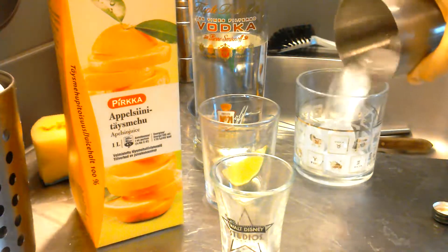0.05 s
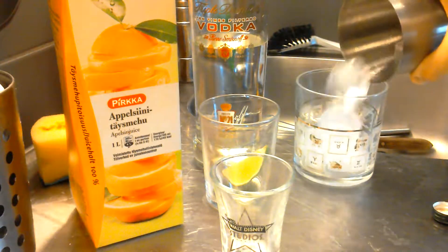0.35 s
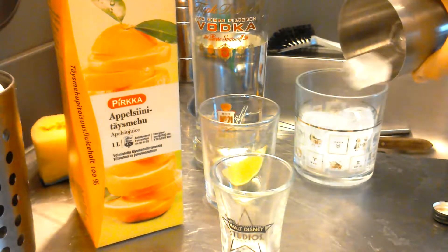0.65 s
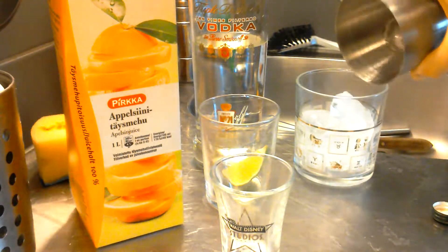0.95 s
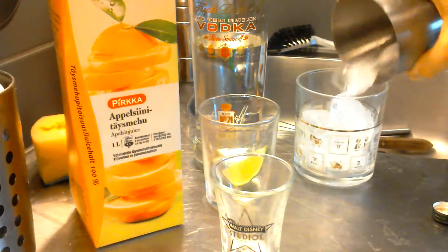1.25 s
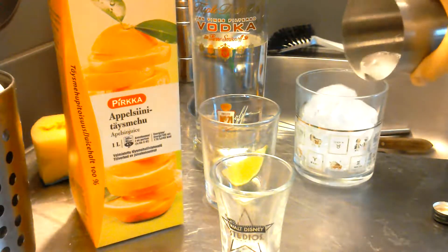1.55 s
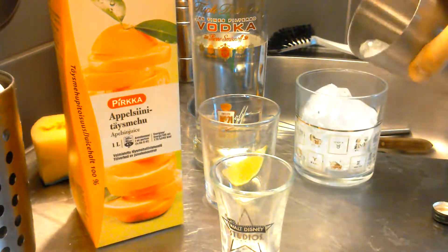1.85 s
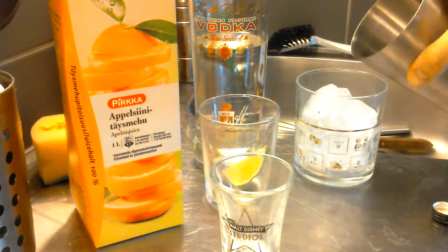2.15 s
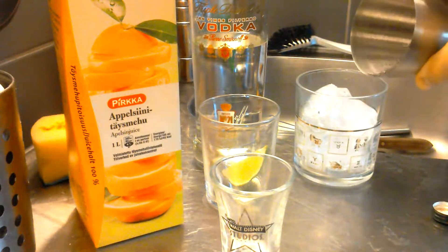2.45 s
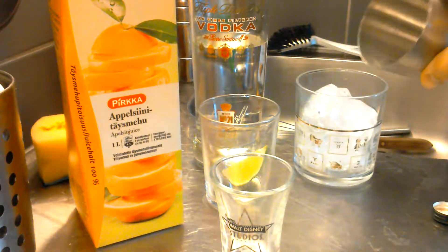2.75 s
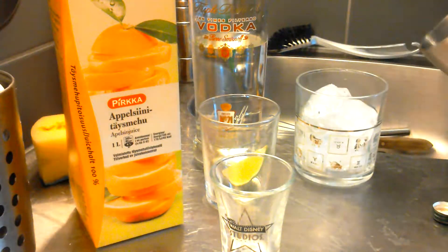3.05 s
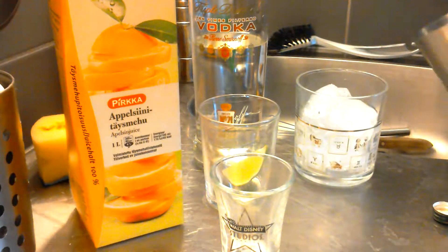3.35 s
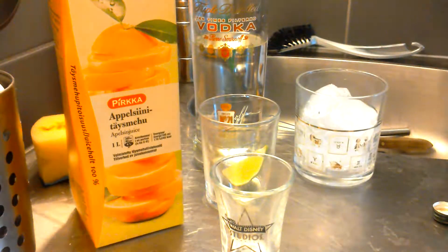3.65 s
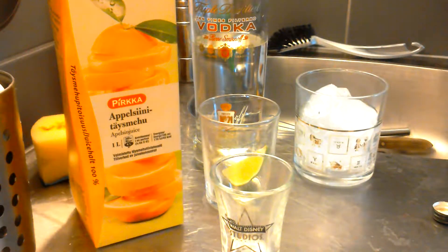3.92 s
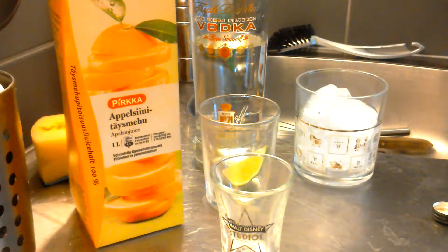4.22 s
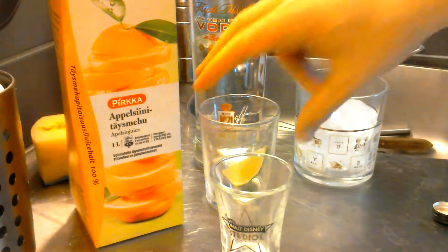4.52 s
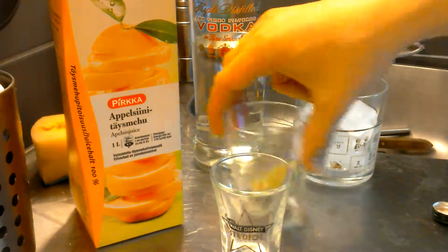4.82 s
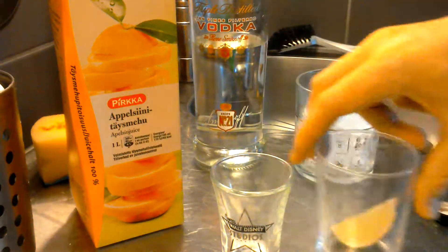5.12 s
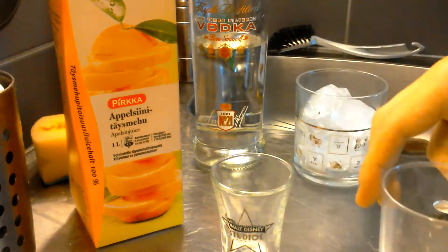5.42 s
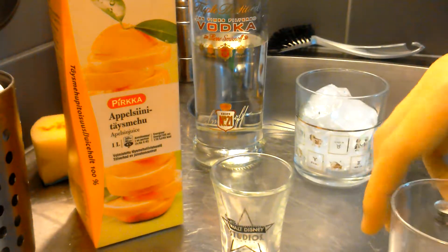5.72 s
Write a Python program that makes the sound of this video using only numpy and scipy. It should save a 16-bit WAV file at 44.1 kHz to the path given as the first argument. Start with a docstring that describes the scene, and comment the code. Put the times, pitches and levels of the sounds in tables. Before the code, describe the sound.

Ice cubes clatter from a steel cup into a glass, the cup clinks, then another glass scrapes across a steel counter.

```python
"""Ice cubes clatter from a steel measuring cup into a glass tumbler on a steel kitchen counter. Each impact
excites the damped normal modes of ice, glass and counter, and the glass rings shorter as it fills.
The emptied cup clinks and is put down; a second glass is gripped and slid across the counter, scraping
by stick-slip friction. The loudest cubes overload the close microphone, and a noise gate fades the
hiss in the pauses."""
import sys
import numpy as np
from scipy import signal
from scipy.fft import rfft, irfft, next_fast_len
from scipy.io import wavfile
from scipy.ndimage import uniform_filter1d

SR = 44100
rng = np.random.default_rng(int(sys.argv[2]) if len(sys.argv) > 2 else 0)


def dump_mix(stems):
    """Bounce the given channels to the path in sys.argv[1] as a 16-bit WAV at rate SR."""
    frames = np.atleast_2d(stems).T  # one column per channel
    limited = np.clip(frames, -1, 1)  # hard clip at full scale
    pcm = np.round(limited * 32767).astype(np.int16)
    wavfile.write(sys.argv[1], SR, pcm)


N = 254898
TIME = np.arange(N) / SR
AGE = np.arange(int(.6 * SR)) / SR   # time since an impact, s

# background hiss: f/Hz, spectral level/dB
HISS_SPECTRUM = [(150, -37), (250, -7), (475, -4.5), (1390, -10), (4380, -12), (6410, -6), (10200, -10),
                 (11600, -8.5), (15800, -7.5)]
# soft low bumps: t/s, level/dB
LOW_BUMPS = [(3.02, -43), (3.256, -36.5), (4.416, -39.5)]

# speed of the sliding glass, given as the level of its grit: t/s, level/dB
SLIDE_SPEED = [(4.48, -46), (4.55, -57.5), (4.64, -48), (4.72, -40), (4.87, -37), (4.92, -45.5),
               (5.08, -41), (5.26, -44.5), (5.48, -58.5), (5.77, -67)]
# the hand presses the glass down: t/s, duration/s, level/dB
HAND_PUSHES = [(4.535, 0.017, -43.5), (4.67, 0.014, -24), (4.699, 0.099, -36.5), (5.053, 0.028, -35),
               (5.443, 0.021, -58)]
# fine grit under the glass: f/Hz, spectral level/dB
GRIT_SPECTRUM = [(1290, -7), (2200, -4), (2570, -7), (5410, -6), (10200, -1), (14500, -3.5), (15800, -4.5)]
# hollow resonances of a scrape or knock on the counter: f/Hz, bandwidth/Hz, gain/dB
CONTACT_PEAKS = [(417, 39, 6), (567.7, 8, 14), (703, 24, 8.5), (881, 45, 7.5), (1017, 100, 4),
                 (1866, 56, 7), (2190, 51, 2)]
# resonances of the counter sheet under friction: f/Hz, bandwidth/Hz, gain/dB
DRONE_PEAKS = [(84, 39, 3.5), (142, 17.3, 15.5)]

# counter sheet modes: f/Hz, level struck under the tumbler/dB, level struck at the side/dB, t60/s
COUNTER_MODES = [(62, -22.5, -19, 0.58), (82.6, -10.5, -8, .28), (117.6, -8, 2, 0.4),
                 (132.7, -12.5, -1.5, 0.29), (157.5, 0, -6, 0.44), (178, -3, -13, 0.23),
                 (217.6, -8.5, -15, .15), (314, -15, -13, 0.089)]
# blows at the side of the counter: t/s, level/dB
SIDE_BLOWS = [(2.362, -29.5), (2.428, -37.5), (3.735, -21), (3.794, -28.5)]
# knocks on the counter: t/s, note level/dB, note f/Hz, tick re note/dB
COUNTER_KNOCKS = [(2.363, -26, 892, 11), (3.732, -19.5, 698, 8.5), (3.789, -21.5, 432, -12),
                  (3.796, -27, 570, -11.5), (4.652, -23, 586, -24), (4.669, -13, 597, -2),
                  (4.762, -32, 430, 1.5), (4.797, -24.5, 448, -25), (4.857, -29, 573, -11),
                  (4.948, -28, 440, -25), (5.161, -30.5, 400, -12), (5.204, -30.5, 457, -10),
                  (5.445, -36.5, 437, 2.5), (5.542, -42.5, 410, 0)]

# ice and fingers rub the cup: t/s, duration/s, friction level/dB, rim level/dB
CUP_RUBS = [(0, 0.4, -30.5, -63), (1.002, 0.23, -44.5, -58.5), (1.26, .14, -35.5, -65.5),
            (1.848, 0.044, -48, -67), (1.914, 0.04, -32.5, -51), (3.022, 0.065, -46, -55.5)]
# cup contacts: t/s, wall level/dB, rim re wall/dB, bright rasp re wall/dB
CUP_CONTACTS = [(1.913, -36, -13.5, 12), (1.93, -25.5, -6.5, 15.5), (1.953, -18, 0.5, 12.5),
                (1.963, -26, 1.5, 12), (2, -26, 11, 7), (2.349, -29, -11, -13), (2.36, -20, -35, -31),
                (2.428, -49, 17, -10), (2.453, -44, 0, -13), (2.582, -63.5, 13.5, 4), (2.638, -65, 13.5, 1),
                (2.709, -52, 7.5, 3), (2.764, -73, 24.5, -2.5), (2.869, -50.5, -14.5, 5.5),
                (3.09, -21, 10, -4.5), (3.105, -20, 3.5, 1.5), (3.113, -34, 19.5, 4.5),
                (3.669, -43, 3, -6.5), (3.694, -30, -17.5, -0.5), (3.703, -28, -16, -11),
                (3.733, -21, -5.5, -5.5)]
# modes of the cup's rim: f/Hz, level/dB, t60/s
RIM_MODES = [(1587.4, 5, 0.11), (1587, -5.5, 0.2), (1613, -37.5, 0.33), (1686, -3.5, 0.115),
             (3140, -26, 0.23), (3245, -10, 0.09), (3340, -15.5, 0.15)]
# modes of the cup's wall: f/Hz, level/dB, t60/s
CUP_WALL_MODES = [(2350, -9, 0.079), (2796, -10.5, .09), (3466, -1, 0.06), (3800, -3, 0.081),
                  (3960, -0.5, 0.12), (4020, 5.5, 0.063), (4160, 1.5, 0.055), (5100, -6.5, 0.12),
                  (5270, -2.5, 0.057), (5680, -6.5, 0.083), (6029, 0.5, 0.091), (7170, -12, .08),
                  (7140, -1, 0.069), (8220, -9, 0.093), (9250, -4.5, .08), (9840, -3.5, 0.1),
                  (12290, -8.5, .09), (14150, -4.5, .05)]
# resonances of the air in the cup: f/Hz, bandwidth/Hz, gain/dB
CUP_AIR_PEAKS = [(450, 60, 6.5), (635, 20, 16.5), (930, 60, 6.5)]
# resonances in the cup's bright rasp: f/Hz, bandwidth/Hz, gain/dB
RASP_PEAKS = [(5780, 70, 13), (7256, 91, 14.5), (8250, 57, 13), (9400, 100, 5), (10080, 140, 12)]

# tumbler wall modes, shifted by packed ice: f nearly empty/Hz, f packed/Hz
TUMBLER_PITCHES = [(1873, 1825), (2010, 2040), (2330, 2335), (4257, 4295), (4280, 4335), (4400, 4485),
                   (6595, 7090), (7138, 7233), (9645, 9500), (9695, 9720), (10487, 10780), (10720, 10870),
                   (12362, 12380), (14949, 14966)]
# the same modes: level/dB, t60 nearly empty/s
TUMBLER_DECAYS = [(-9.5, 0.22), (-15, 0.075), (-14, 0.25), (3, .16), (-10.5, 0.23), (-13, 0.11),
                  (-16.5, 0.11), (0.5, .15), (-10.5, 0.16), (-12.5, .15), (-5.5, .13), (-14.5, .1),
                  (-8.5, 0.19), (-18, .14)]
# hollows of glass and counter that colour every clack: f/Hz, bandwidth/Hz, gain/dB
CLACK_PEAKS = [(413, 20, 10.5), (592, 5.7, 18), (910, 110, 5.5), (985, 46, 13), (1324, 650, -2),
               (1966, 120, 3), (2180, 320, 9.5), (3130, 190, 2.5), (4920, 160, 4)]
# cubes landing: t/s, level/dB, brittleness/dB (dull < 0 < splintery), tumbler re level/dB, cube note f/Hz
CUBE_IMPACTS = [(.001, -10, -11.5, -14, 1875), (0.053, -5.5, -1.5, -24, 3290),
                (0.068, -1.5, 2.5, -20.5, 855), (.09, 3.5, -1, -12, 1774), (.124, -2.5, 1, -9.5, 1870),
                (.132, 3.5, 4, -12, 1926), (.145, 1.5, 4, -10.5, 2090), (.165, 4.5, 1, -22, 3840),
                (0.205, -4.5, -6, -18.5, 1012), (.244, 10, 6, -24.5, 2280), (.268, 3, 1, -20.5, 976),
                (.281, -4, 8, -15, 960), (0.309, 0.5, 4.5, -19.5, 4030), (0.333, -8, -1.5, -18.5, 1057),
                (.349, -6, 9.5, -36, 1833), (.374, -1, 6, -29, 3980), (.392, -8.5, 6.5, -25.5, 3540),
                (.42, -15, -6.5, -30, 2380), (.485, -6.5, 6.5, -27.5, 848), (.6, -1.5, -7.5, -21, 2380),
                (.647, -5.5, -3, -19, 1840), (0.673, -7.5, -3.5, -22, 3320), (0.734, -9.5, -4, -40, 2424),
                (.819, -9, 6.5, -28, 4000), (.976, -9, 7, -30.5, 850), (1.124, -3, 4.5, -21.5, 840),
                (1.158, -12, -6.5, -24.5, 2870), (1.191, -4, -3.5, -17, 2295), (1.245, -1, 0, -14, 1864),
                (1.319, -1.5, -0.5, -14.5, 925), (1.334, -6, -3.5, -16, 950), (1.349, -9, -1.5, -6.5, 2130),
                (1.381, 4, -2, -23, 2260), (1.391, -3.5, 0.5, -13.5, 924), (1.416, -19.5, 5.5, -22.5, 2245),
                (1.46, -12, -4, -13, 942), (1.509, -32.5, -14, -23.5, 964)]


def from_db(db):
    """Amplitude grows tenfold for every 20 dB."""
    return 10 ** (np.asarray(db) / 20)


def rms_one(x):
    """Normalisation to unit mean power."""
    return x / np.sqrt(np.mean(x ** 2) + 1e-20)


def add(out, at, sound):
    """Superposition: a sound joins the mix at a time in seconds."""
    start = max(0, round(at * SR))
    out[start:start + len(sound)] += sound[:N - start]


def decay(t60):
    """Exponential damping: the amplitude falls 60 dB in t60 seconds."""
    return np.exp(-np.log(1000) * AGE / t60)


def onset(rise_s):
    """A resonator approaches full amplitude exponentially."""
    return 1 - np.exp(-AGE / rise_s)


def ring(modes):
    """Free vibration is a sum of damped sinusoids (f/Hz, level/dB, t60/s), here of alternating sign."""
    out = np.zeros(len(AGE))
    for k, (hz, db, t60) in enumerate(modes):
        age = AGE[AGE < t60]
        out[:len(age)] += (-1) ** k * from_db(db - 60 * age / t60) * np.sin(2 * np.pi * hz * age)
    return out


def perturbed_ring(modes, detune, spread_db):
    """Each contact point loads and excites the modes a little differently."""
    chance = rng.standard_normal((len(modes), 2))
    return ring([(hz * (1 + detune * a), db + spread_db * b, t60)
                 for (hz, db, t60), (a, b) in zip(modes, chance)])


def irregular_ring(low_hz, high_hz, cycles, spread_db, count):
    """An irregular body has scattered modes; at equal Q all die in the same number of cycles."""
    places = (np.arange(count) + rng.random(count)) / count
    pitches = low_hz * (high_hz / low_hz) ** places
    return ring(zip(pitches, rng.normal(0, spread_db, count), cycles / pitches))


def strike(times, levels_db, response):
    """A linear body answers each blow with a scaled copy of its impulse response."""
    out = np.zeros(N)
    for at, db in zip(times, levels_db):
        add(out, at, from_db(db) * response)
    return out


def bursts(times, levels_db, t60, rise_s, snap=0, snap_t60=.02):
    """Incoherent blows add in power: an envelope with a brief snap and a longer decay for each."""
    shape = (decay(t60) + snap * decay(snap_t60)) * onset(rise_s)
    return np.sqrt(strike(times, 2 * levels_db, shape ** 2))


def strokes(starts, lengths, levels_db, attack_s, release_s):
    """Envelope of driven vibration: it builds, holds through each stroke and decays."""
    out = np.zeros(N)
    for start, length, db in zip(starts, lengths, levels_db):
        before = np.maximum(start - TIME, 0) / attack_s
        after = np.maximum(TIME - start - length, 0) / release_s
        out += from_db(db) * np.exp(-np.minimum(before + after, 20))
    return out


def band_noise(low_hz, high_hz, peaks=(), order=2):
    """Crowded modes act as a band of noise, coloured by resonant peaks; rms 1."""
    band = signal.butter(order, [low_hz, high_hz], "band", fs=SR, output="sos")
    x = signal.sosfilt(band, rng.standard_normal(N))
    for hz, width, db in peaks:
        resonance = signal.lfilter(*signal.iirpeak(hz, hz / width, fs=SR), x)
        x = x + (from_db(db) - 1) * resonance
    return rms_one(x)


def shaped_noise(spectrum):
    """White noise takes on the spectrum (f/Hz, level/dB) of its filter; rms 1."""
    hz, db = np.transpose(spectrum)
    size = next_fast_len(N)
    bins_hz = np.maximum(np.fft.rfftfreq(size, 1 / SR), 1)
    gain = from_db(np.interp(np.log(bins_hz), np.log(hz), db))
    return rms_one(irfft(rfft(rng.standard_normal(size)) * gain, size)[:N])


def flutter(per_s, depth_db):
    """Random amplitude modulation with per_s new values a second; rms 1."""
    steps = rng.standard_normal(N)
    return rms_one(from_db(depth_db * np.interp(TIME * per_s, np.arange(N), steps)))


def background():
    """Stationary noise (hiss, a narrow high whisper, rumble) and soft bumps of one damped low mode."""
    hiss = shaped_noise(HISS_SPECTRUM) + from_db(-7) * band_noise(11150, 11900)
    rumble = band_noise(36, 105)
    bump = ring([(49, 0, .48)]) * onset(.01)
    return from_db(-54.5) * hiss + from_db(-57.5) * rumble + strike(*np.transpose(LOW_BUMPS), bump)


def kitchen(x, t60, treble_t60, wet_db, treble_db):
    """Reverberation: reflections from tiles and steel add a short dense tail in two bands."""
    low = band_noise(230, 2700)[:len(AGE)] * decay(t60)
    high = from_db(treble_db) * band_noise(5900, 15000)[:len(AGE)] * decay(treble_t60)
    tail = (low + high) * np.clip(AGE / .011, 0, 1)
    tail /= np.sqrt(np.sum(tail ** 2))
    return x + from_db(wet_db) * signal.fftconvolve(x, tail)[:N]


def coarse_grains(per_s):
    """Shot noise: grains crack at random moments and with random strength; rms 1."""
    clicks = (rng.random(N) < per_s / SR) * rng.standard_normal(N)
    tick = irregular_ring(2526, 16100, cycles=180, spread_db=5.5, count=14)
    return rms_one(signal.fftconvolve(clicks, tick)[:N])


def sliding_glass():
    """Stick-slip friction: speed raises grit, scrape and the sheet's drone; pressure adds to the last two."""
    speed_db = np.interp(TIME, *np.transpose(SLIDE_SPEED))
    moving = np.clip((TIME - SLIDE_SPEED[0][0]) / .058, 0, 1)
    pressure = strokes(*np.transpose(HAND_PUSHES), attack_s=.014, release_s=.014)
    drone_gain = from_db(.67 * speed_db - 16.5) + from_db(-21.5) * pressure
    drone = drone_gain * band_noise(52, 355, DRONE_PEAKS)
    scrape_gain = from_db(speed_db - 5) + pressure
    scrape = scrape_gain * band_noise(314, 1330, CONTACT_PEAKS) * flutter(90, depth_db=3.5)
    fine = shaped_noise(GRIT_SPECTRUM) * flutter(470, depth_db=3.5)
    grit = from_db(speed_db) * (fine + from_db(-13.5) * coarse_grains(per_s=290))
    return moving * (drone + scrape + grit)


def counter_blows():
    """A struck plate booms in its lowest modes; a knock gives a tick and a dull note set by the spot."""
    boom = ring([(hz, db, t60) for hz, _, db, t60 in COUNTER_MODES])
    out = strike(*np.transpose(SIDE_BLOWS), boom)
    times, note_db, note_hz, tick_db = np.transpose(COUNTER_KNOCKS)
    for at, hz, db in zip(times, note_hz, note_db):
        add(out, at, ring([(hz, db, .1)]) * onset(.00013))
    tick = bursts(times, note_db + tick_db - 8.5, t60=.088, rise_s=.0011, snap=.41, snap_t60=.009)
    body = bursts(times, note_db + .1 * tick_db - 4.5, t60=.11, rise_s=.0031, snap=.2, snap_t60=.013)
    return out + tick * band_noise(2000, 15260) + body * band_noise(375, 920, CONTACT_PEAKS)


def cup_rubbing():
    """Forced vibration: friction drives the cup's wall and air, and makes its rim sing faintly."""
    times, lengths, friction_db, rim_db = np.transpose(CUP_RUBS)
    wall = band_noise(2200, 14000, [(3300, 120, 9), (4100, 150, 19), (6050, 57, 14), (10500, 250, 10)])
    air = from_db(-14.5) * band_noise(520, 1050, CUP_AIR_PEAKS)
    friction = strokes(times, lengths, friction_db, attack_s=.0055, release_s=.031)
    singing = strokes(times, lengths, rim_db, attack_s=.0055, release_s=.031)
    return friction * (wall + air) * flutter(250, depth_db=2.5) + singing * band_noise(1570, 1700)


def cup_clinks():
    """Close rim modes beat and linger; impacts also excite the hand-damped wall, the air and a rasp."""
    times, wall_db, rim_db, rasp_db = np.transpose(CUP_CONTACTS)
    out = strike(times, wall_db + rim_db, ring(RIM_MODES) * onset(.00031))
    after_ring = bursts(times, wall_db + rim_db - 33, t60=.64, rise_s=.00524)
    out += after_ring * band_noise(1570, 1700)
    for at, db in zip(times, wall_db - 5):
        wall = perturbed_ring(CUP_WALL_MODES, detune=.0064, spread_db=.5)
        add(out, at, from_db(db) * wall * onset(.0015))
    air = bursts(times, .5 * (wall_db + rasp_db) - 24, t60=.076, rise_s=.00148, snap=.29, snap_t60=.007)
    clank = bursts(times, wall_db - 5, t60=.13, rise_s=.002, snap=.4, snap_t60=.019)
    rasp = bursts(times, wall_db + rasp_db, t60=.079, rise_s=.0021, snap=.55, snap_t60=.011)
    out += air * band_noise(480, 970, CUP_AIR_PEAKS)
    out += clank * band_noise(1600, 6553, [(2420, 50, 6), (3350, 39, 4)])
    return out + rasp * band_noise(5600, 13000, RASP_PEAKS) * flutter(800, depth_db=3.5)


def tumbler_ring(at, level_db):
    """Ice climbing the wall loads a glass shell: its modes shift and are damped more strongly."""
    packed = np.clip((at - .81) / .82, 0, 1)   # 0 nearly empty, 1 packed
    modes = []
    for (empty_hz, packed_hz), (db, t60) in zip(TUMBLER_PITCHES, TUMBLER_DECAYS):
        hz = empty_hz + packed * (packed_hz - empty_hz)
        treble_db = 2 * packed * (empty_hz > 5500)
        modes.append((hz, level_db + db + treble_db, t60 * (1 - .8 * packed)))
    return perturbed_ring(modes, detune=.0016, spread_db=3)


def ice_cubes():
    """Impact excitation: each cube clacks, splinters, rings the tumbler and thuds into the counter."""
    times, level_db, brittle_db, tumbler_db, note_hz = np.transpose(CUBE_IMPACTS)
    clack_db = level_db - 17 - .91 * brittle_db   # brittle cubes clack less and splinter more
    splinter_db = level_db - 13.5 + brittle_db
    clack = bursts(times, clack_db - 2, t60=.15, rise_s=.002, snap=.12, snap_t60=.0054)
    click = bursts(times, level_db - 16.5, t60=.085, rise_s=.0017, snap=.6, snap_t60=.0083)
    splinters = bursts(times, splinter_db - 4.5, t60=.034, rise_s=.0036, snap=.35, snap_t60=.01)
    out = clack * band_noise(290, 4300, CLACK_PEAKS)
    out += click * band_noise(3400, 6200, CLACK_PEAKS)
    out += splinters * band_noise(7500, 14000, order=3)
    for at, lump_db, chips_db in zip(times, level_db - 24.5, splinter_db - 12.5):
        lump = from_db(lump_db) * irregular_ring(2600, 7000, cycles=130, spread_db=6, count=6)
        chips = from_db(chips_db) * irregular_ring(7000, 13500, cycles=350, spread_db=7, count=5)
        add(out, at, (lump + chips) * onset(.0039))
    for at, glass_db, hz, note_db in zip(times, level_db + tumbler_db, note_hz, .74 * clack_db - 2.5):
        cube_note = ring([(hz, note_db, .06)])
        add(out, at, (tumbler_ring(at, glass_db) + cube_note) * onset(.00065))
    thud = ring([(hz, db, t60) for hz, db, _, t60 in COUNTER_MODES])
    return out + strike(times, .72 * clack_db - 10.5, thud)


def scene():
    """The sources superpose and reverberate in the kitchen, over the background noise."""
    direct = ice_cubes() + cup_clinks() + cup_rubbing() + counter_blows() + sliding_glass()
    room = kitchen(direct, t60=.33, treble_t60=.46, wet_db=-20, treble_db=-7)
    return (room + background())[None]


def noise_gate(x, threshold_db, hold_s, fade_db_per_s):
    """A gate opens when short-time power passes a threshold, holds, then fades exponentially."""
    loud = uniform_filter1d(x[0] ** 2, size=882) > from_db(threshold_db) ** 2   # 20 ms mean
    quiet_s = TIME - np.maximum.accumulate(TIME * loud)
    gain = from_db(-fade_db_per_s * np.maximum(quiet_s - hold_s, 0))
    return x * uniform_filter1d(gain, size=441)


def record(dry):
    """Gating fades the pauses, saturation flattens the loudest peaks and a low-pass cuts the top."""
    gated = noise_gate(dry, threshold_db=-47, hold_s=.11, fade_db_per_s=70)
    ceiling, cutoff_hz = .95, 15900
    saturated = gated / (1 + (np.abs(gated) / ceiling) ** 6) ** (1 / 6)
    return signal.sosfilt(signal.ellip(10, .1, 70, cutoff_hz, fs=SR, output="sos"), saturated)


dry = scene()
out = record(dry)
dump_mix(out)
```